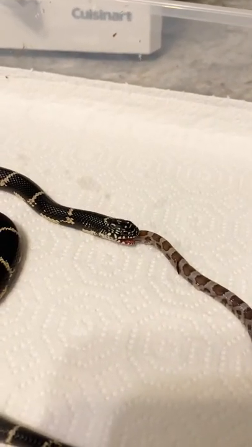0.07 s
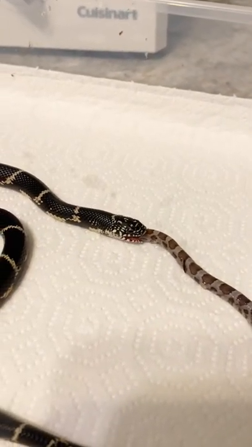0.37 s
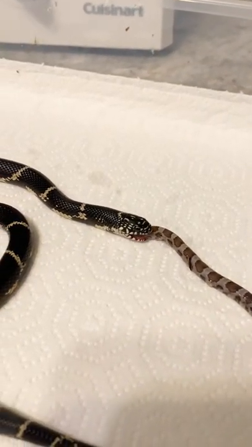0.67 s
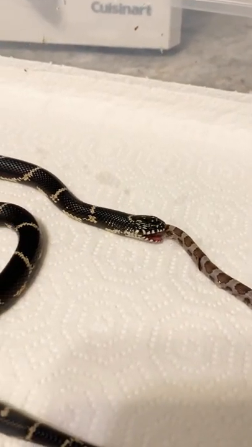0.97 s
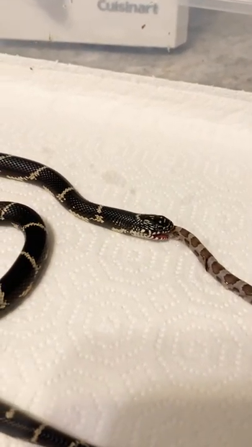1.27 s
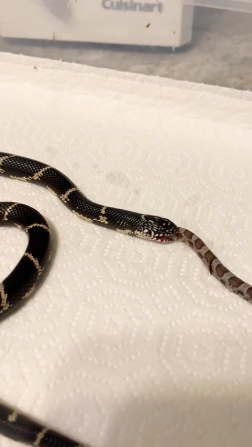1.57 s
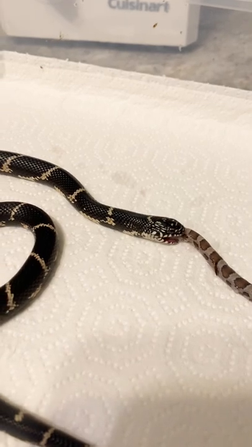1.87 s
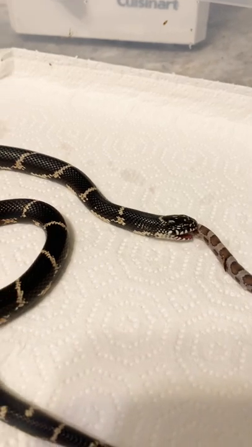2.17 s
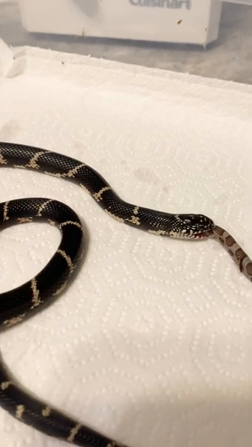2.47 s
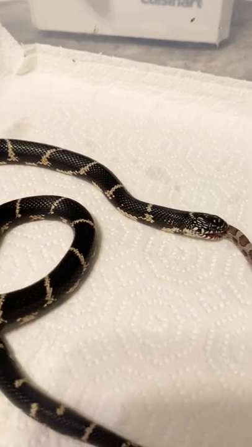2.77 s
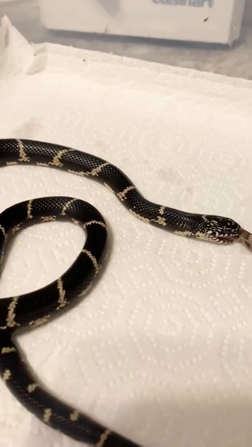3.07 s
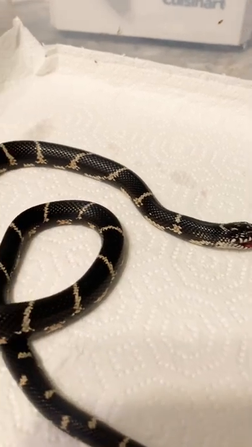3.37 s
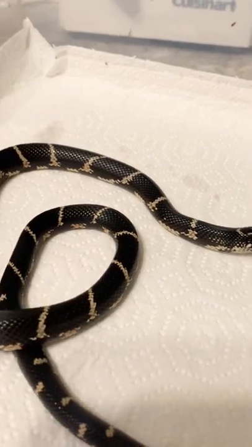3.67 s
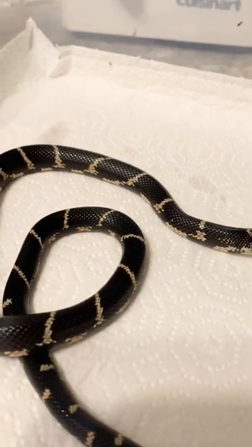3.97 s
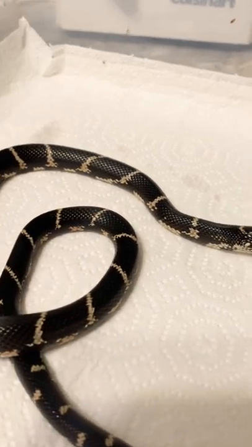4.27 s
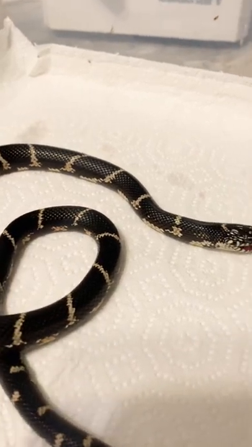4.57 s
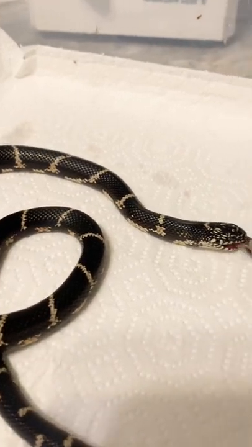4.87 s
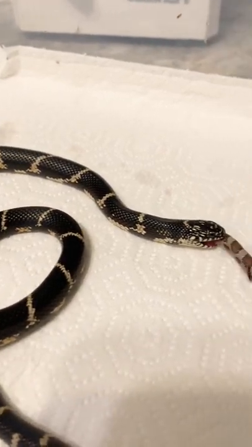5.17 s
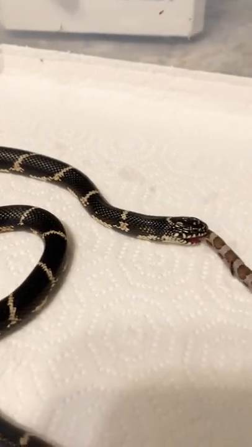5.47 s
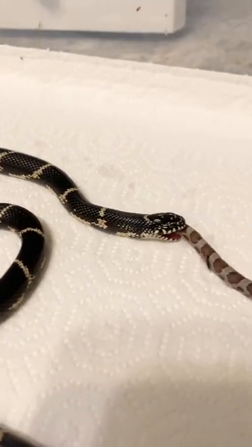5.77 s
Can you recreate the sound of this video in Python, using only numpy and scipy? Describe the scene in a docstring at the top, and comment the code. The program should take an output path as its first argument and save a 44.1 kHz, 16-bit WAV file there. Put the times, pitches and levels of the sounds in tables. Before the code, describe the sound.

A compressor and a fan hum steadily in a quiet room, their low tones throbbing over a dull rush of air and a thin hiss. Close to the stereo microphone, a snake's scales brush very faintly over paper towel at the start and again about two seconds in. In the second half, the paper gives four tiny, crisp ticks inside a plastic tub.

```python
"""A snake feeding on paper towel in a plastic tub, close to a stereo microphone in a quiet room.
Paper fibres snap in a few tiny ticks, and scales rustle softly over the towel as the snake shifts.
Behind it, and carrying most of the level, a compressor and a fan hum and throb as close tones beat.
Moving air fills the room with a dull roar, and a thin hiss lies on top."""
import sys
import numpy as np
from scipy import signal
from scipy.fft import rfft, irfft
from scipy.io import wavfile

SR = 44100
rng = np.random.default_rng(int(sys.argv[2]) if len(sys.argv) > 2 else 0)


def unload_wav(signal):
    """Save mono or channel-first audio to the path in sys.argv[1] as 16-bit WAV at rate SR, clipped to [-1, 1]."""
    wavfile.write(
        sys.argv[1],
        SR,
        np.round(np.clip(np.atleast_2d(signal).T, -1, 1) * 32767).astype(np.int16),
    )


N = 265482
TIME, FREQ = np.arange(N) / SR, np.fft.rfftfreq(N, 1 / SR)
COMPRESSOR_HZ, FAN_HZ = 59.31, 45.24  # shaft speeds


def paper_ticks(crackle_db=-9, tail_db=-25.5, tail_s=.012, swell_s=.00022):
    """Close up, a paper fibre snaps, rings and crackles; the tub walls add faint reflections."""
    # t/s, level/dB, tilt/(dB per octave), crackle decay/s, ring gain, ring pitch ratio
    ticks = [(3.7455, -54.8, -1.2, .0003, .13, 1.03), (3.9347, -52.6, -1.4, .0008, .11, 1.04),
             (4.2337, -50.2, 1.3, .0007, .29, 1.02), (5.6527, -53.6, -3.8, .0005, 1.5, 1)]
    # resonances of towel and tub: f/Hz, level/dB, decay/s
    modes = [(1620, -13, .002), (4150, -6, .0008), (4650, -2, .0007), (5470, 1, .0008), (6050, -.5, .0008),
             (10600, -20, .0006)]
    # spectrum of a bare snap: f/Hz, level/dB
    snap_spectrum = [(1200, -12), (3000, -1), (4700, -3), (6300, 1), (10000, .5), (12500, -6), (15500, -12)]
    # first reflections in the tub: delay/s, level/dB
    reflections = [(.0018, -12), (.0045, -18)]
    out = np.zeros(len(FREQ), complex)
    age = np.arange(SR // 10) / SR
    bare = gain_of(read(snap_spectrum, FREQ))
    walls = 1 + sum(gain_of(db) * delay(delay_s) for delay_s, db in reflections)
    for start_s, db, tilt_db, crackle_s, ring_gain, pitch in ticks:
        ring = sum(gain_of(mode_db) * np.exp(-age / decay_s) * np.cos(2 * np.pi * pitch * hz * age)
                   for hz, mode_db, decay_s in modes)
        ring *= 1 - np.exp(-age / swell_s)
        fibres, tail = rng.choice([-1, 1], (2, len(age))) * (age > 0)
        crackle = gain_of(crackle_db) * np.exp(-age / crackle_s) * fibres
        snap = 2 * (age == 0) + gain_of(tail_db) * np.exp(-age / tail_s) * tail
        tick = rfft(snap, N) * (bare + ring_gain * rfft(ring, N) / 2) + rfft(crackle, N) * bare
        out += tick * gain_of(db + tilt(tilt_db)) * delay(start_s)
    return from_left(out * walls)


def scale_rustles(grain_db=4, grain_hz=400):
    """Scales slide over the paper near the microphone: short swells of fine, uneven grains."""
    # crest t/s, level/dB, rise/s, fall/s, tilt/(dB per octave)
    strokes = [(.204, -76.3, .008, .033, -5.5), (.4, -75.7, .005, .027, -6), (2.05, -77.5, .005, .04, 8),
               (2.093, -72.6, .011, .022, 2.8), (2.12, -79, .006, .045, 8)]
    # spectrum of scales on paper: f/Hz, level/dB
    friction = [(1500, -22), (3000, -6), (6200, 0), (7800, -1), (9700, 1), (11000, -2), (12800, -2),
                (14500, -7), (15800, -13)]
    out = np.zeros((2, N))
    for crest_s, db, rise_s, fall_s, tilt_db in strokes:
        swell = np.exp(-np.maximum((crest_s - TIME) / rise_s, (TIME - crest_s) / fall_s))
        scrape = from_left(noise_pair(1.0) * gain_of(read(friction, FREQ) + tilt(tilt_db)))
        grains = gain_of(grain_db * drift(grain_hz))
        out += gain_of(db) * swell * evened(scrape * grains)
    return out


def compressor(whine_order=27, fade_share=.037):
    """Shaft orders on one slightly wandering speed, with a throbbing bass and a thin whine."""
    # hum: shaft multiple, level/dB
    orders = [(3, -62.3), (4, -63.8), (7, -73.2), (8, -75.5), (11, -80.2), (13, -90.2), (14, -89.5),
              (16, -96.7), (17, -89.4), (18, -86.5), (20, -81.8), (21, -93.7), (23, -94.8), (24, -97.1),
              (36, -105.7), (37, -98.3), (38, -106.5), (47, -109), (48, -109), (50, -106), (51, -99.6),
              (52, -101.8), (54, -104.8), (56, -105), (57, -107.5), (61, -101.5), (62, -110), (64, -111),
              (69, -108), (104, -106), (105, -109), (109, -107), (110, -108.5)]
    # the whine sinks slowly, then comes back quickly: t/s, level/dB
    whine_curve = [(0, -81), (2.1, -82.5), (2.8, -86), (3.5, -93.5), (4.5, -96), (5.05, -93), (5.22, -82.3),
                   (6, -81.3)]
    wander_s = 4e-5 * drift(1.5)
    whine_db = np.interp(TIME, *np.transpose(whine_curve))
    out = compressor_throb(wander_s)
    out += tone(whine_order * COMPRESSOR_HZ, whine_db, wander_s, flutter=.14)
    fade_db = fade_share * (whine_db - whine_db.mean())
    for order, db in orders:
        fades_with_whine = order > 30
        out += tone(order * COMPRESSOR_HZ, db + fades_with_whine * fade_db, wander_s, flutter=.22)
    return out


def compressor_throb(wander_s):
    """Slightly slower motors and the mains hum beat against the compressor's two lowest orders."""
    # bass: shaft multiple, level/dB
    orders = [(1, -62.4), (2, -59.8)]
    # tones beside them: shaft multiple, offset/Hz, level/dB, crest t/s
    neighbours = [(1, -.325, -60.9, 2.04), (1, -.65, -74, 1.7), (2, -.66, -65, 2.0),
                  (2, -1.32, -71.9, 2.07), (2, 1.4, -63.4, 2.03)]
    out = np.zeros((2, N))
    for order, db in orders:
        hz = order * COMPRESSOR_HZ
        angle = 2 * np.pi * (hz * (TIME + wander_s) + rng.random())
        beside = sum(gain_of(near_db) * np.cos(angle + 2 * np.pi * offset_hz * (TIME - crest_s))
                     for multiple, offset_hz, near_db, crest_s in neighbours if multiple == order)
        out += np.sqrt(2) * (gain_of(db) * np.cos(angle) + beside) * standing_waves(hz)
    return out


def fan():
    """The fan hums on a looser shaft; other machine tones beside it each wander on their own."""
    # hum: shaft multiple, level/dB
    orders = [(4, -61), (6, -66), (7, -65), (8, -63), (12, -78)]
    # other machine tones: f/Hz, level/dB
    drones = [(108.3, -61), (126.5, -63.5), (133.9, -67), (216.0, -66)]
    wander_s = .00018 * drift(.64)
    hum = sum(tone(order * FAN_HZ, db, wander_s, flutter=.12) for order, db in orders)
    return hum + sum(tone(hz, db, 4e-4 * drift(.69), flutter=.2) for hz, db in drones)


def machine_thrum(hz=86.2, db=-61, beat_hz=3.95, crest_s=.12):
    """Two low machine tones a few Hz apart swell and cancel in turn."""
    low = 2 * np.pi * (hz * TIME + rng.random())
    high = low + 2 * np.pi * beat_hz * (TIME - crest_s)
    return np.sqrt(2) * gain_of(db) * (np.cos(low) + np.cos(high)) * standing_waves(hz)


def moving_air(bands_hz=(110, 260, 450, 650, 1100), waver_db=.9, waver_hz=9):
    """Dull roar of air all round the microphone, coloured by the room; it wavers band by band."""
    # spectrum of the air: f/Hz, level/(dB per Hz)
    spectrum = [(20, -102.5), (40, -91), (60, -79), (78, -78.5), (88, -74), (145, -86), (165, -82.5),
                (190, -79.5), (300, -78), (340, -84.5), (385, -87.5), (405, -85), (460, -87), (510, -84),
                (590, -85), (625, -89.5), (660, -87), (690, -97), (1080, -100.0), (1550, -106.9),
                (1800, -121), (2600, -145)]
    # room resonances and one dip: f/Hz, width/Hz, lift/dB
    room_modes = [(100.6, 16, 8.5), (128, 26, -4), (213.2, 14, 6.5), (257.9, 21.2, 7.5), (428.7, 16, 7),
                  (980, 63, 3)]
    # likeness of left and right: f/Hz, coherence
    coherence = [(60, 0.98), (200, 0.89), (330, 0.89), (550, 0.8), (800, 0.064), (1100, 0.11), (1600, 0.07)]
    colour = gain_of(read(spectrum, FREQ) + lift(room_modes))
    roar = noise_pair(read(coherence, FREQ)) * colour * standing_waves(FREQ)
    bands = [np.interp(FREQ, bands_hz, row) for row in np.eye(len(bands_hz))]
    return sum(irfft(roar * band, N) * gain_of(waver_db * drift(waver_hz)) for band in bands)


def hiss(waver_db=.5, waver_hz=18):
    """Thin, nearly steady background hiss with a few faint whistles."""
    # spectrum of the hiss: f/Hz, level/(dB per Hz)
    spectrum = [(1000, -121), (2000, -116), (2600, -120.1), (3100, -118.6), (3800, -120.3), (4200, -119.8),
                (4750, -123.5), (5300, -123.4), (6200, -122.3), (7200, -125.7), (8600, -125),
                (11000, -126.3), (13000, -127.6), (14400, -130.6), (15300, -141)]
    # narrow peaks: f/Hz, width/Hz, lift/dB
    whistles = [(2340, 90, 1.5), (3020, 130, 1.3), (5490, 110, 3), (6180, 80, 1.5), (6430, 130, 2),
                (8560, 80, 5)]
    # likeness of left and right: f/Hz, coherence
    coherence = [(2000, .5), (3600, .55), (4600, .93), (9000, .92), (14000, .88)]
    noise = noise_pair(read(coherence, FREQ)) * gain_of(read(spectrum, FREQ) + lift(whistles))
    return from_left(noise) * gain_of(waver_db * drift(waver_hz))


def tone(hz, db, wander_s, flutter):
    """A machine tone whose shaft runs early or late; high tones reach the two capsules out of step."""
    angle = 2 * np.pi * (hz * (TIME + wander_s) + rng.random())
    pair = np.array([np.cos(angle), np.cos(angle - right_lag(hz))])
    return np.sqrt(2) * gain_of(db) * (1 + flutter * drift(3.3)) * pair * standing_waves(hz)


def standing_waves(hz):
    """Left and right gains: standing waves make a pitch louder at one capsule than at the other."""
    # f/Hz, left minus right level/dB
    balance = [(60, 0), (110, -1.5), (200, -2), (370, -4.5), (500, -2), (1270, -1), (2300, 0.5)]
    return gain_of(np.array([[.5], [-.5]]) * read(balance, hz))


def right_lag(hz):
    """Phase by which the right capsule trails the left."""
    # f/Hz, lag/rad
    lags = [(1200, 0), (1600, 1.1), (3500, 1.5), (4550, np.pi), (17750, 7 * np.pi)]
    return np.interp(hz, *np.transpose(lags))


def from_left(spectrum):
    """Turns a spectrum into sound at both capsules, the left one first."""
    return irfft(spectrum * np.array([np.ones(len(FREQ)), np.exp(-1j * right_lag(FREQ))]), N)


def gain_of(db):
    """Decibels to amplitude."""
    return 10 ** (np.asarray(db) / 20)


def evened(x):
    """Scales to rms 1."""
    return x / np.sqrt(np.mean(x ** 2) + 1e-30)


def read(points, hz):
    """Reads a spectrum table on a log-frequency axis."""
    f, value = np.transpose(points)
    return np.interp(np.log(hz + 1), np.log(f + 1), value)


def lift(peaks):
    """Decibels added by a few resonances."""
    return sum(db / (1 + (2 * (FREQ - hz) / width) ** 4) for hz, width, db in peaks)


def tilt(db_per_octave):
    """Decibels that brighten or dull the treble, pivoting at 6 kHz."""
    return db_per_octave * np.log2(np.maximum(FREQ, 3000) / 6000)


def delay(seconds):
    """Spectrum of a pure delay."""
    return np.exp(-2j * np.pi * FREQ * seconds)


def white():
    """Spectrum of a white noise with unit power per Hz."""
    return rfft(rng.standard_normal(N)) * np.sqrt(SR / 2)


def drift(rate_hz):
    """Smooth random motion of rms 1, mostly slower than rate_hz."""
    return evened(irfft(white() * np.exp(-(FREQ / rate_hz) ** 2) * (FREQ > 0), N))


def noise_pair(coherence):
    """Left and right white spectra with the given likeness."""
    left = white()
    return np.array([left, coherence * left + np.sqrt(1 - coherence ** 2) * white()])


def scene():
    """Machines and air in the room, the snake on its paper close by."""
    room = compressor() + fan() + machine_thrum() + moving_air() + hiss()
    return room + paper_ticks() + scale_rustles()


def record(dry):
    """The recorder cuts the treble above 15.7 kHz."""
    lowpass = signal.firwin(511, 15700, window=("kaiser", 9), fs=SR)
    return signal.oaconvolve(dry, lowpass[None], "same")


dry = scene()
out = record(dry)
unload_wav(out)
```